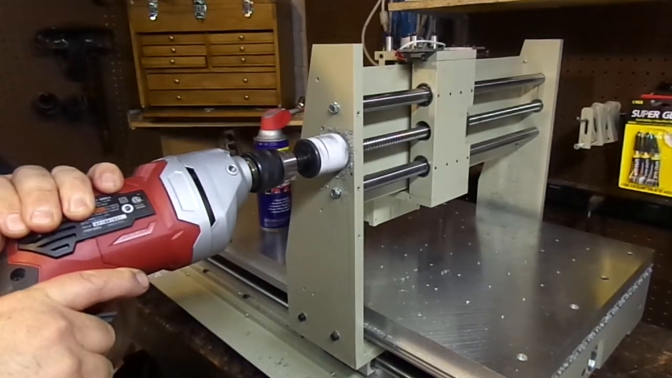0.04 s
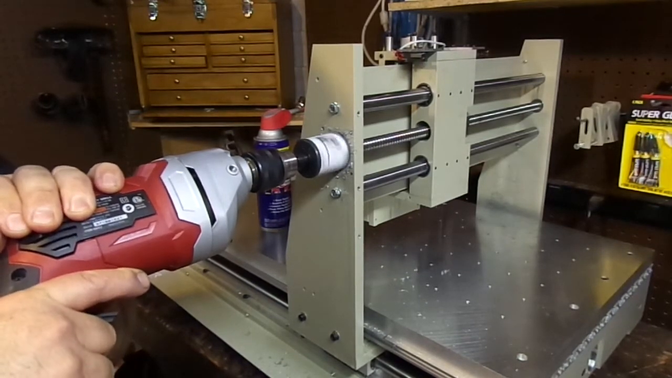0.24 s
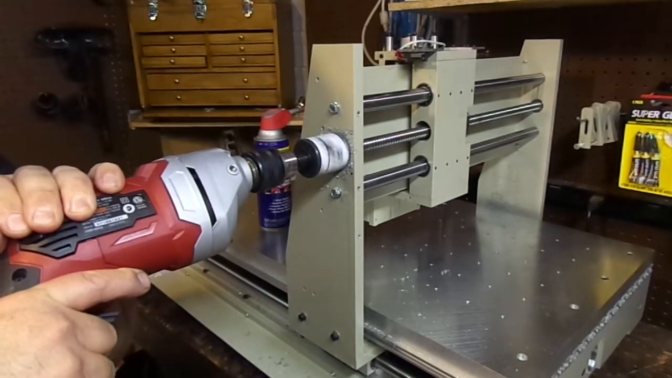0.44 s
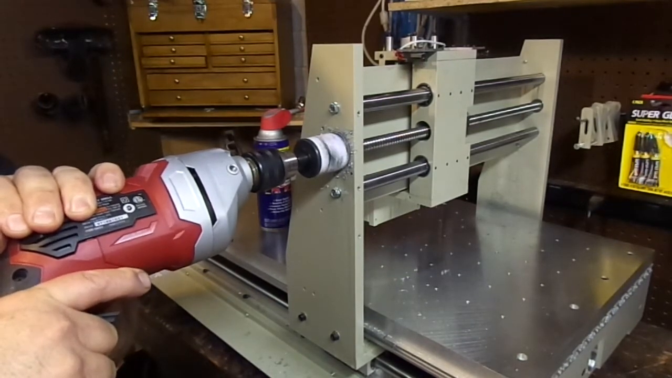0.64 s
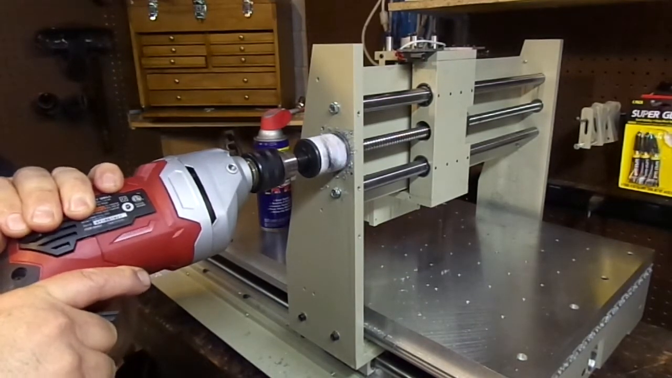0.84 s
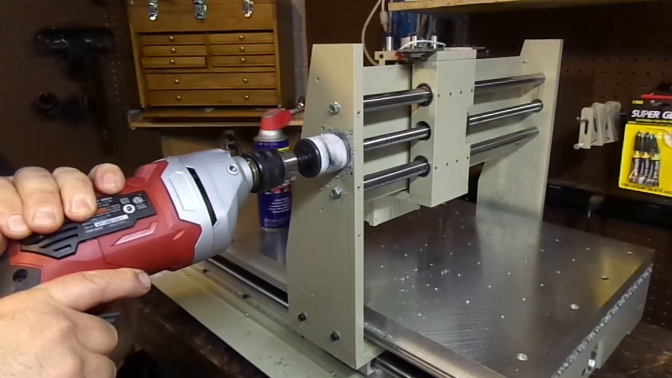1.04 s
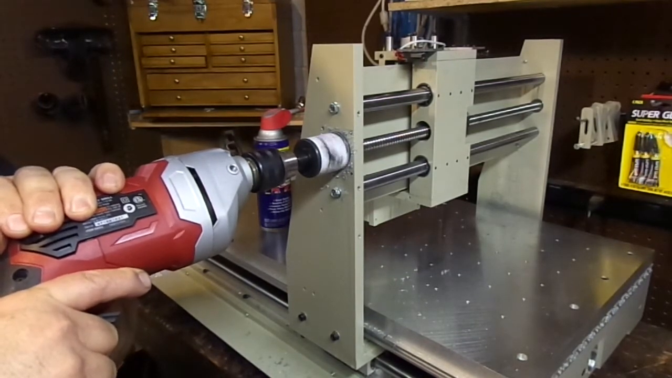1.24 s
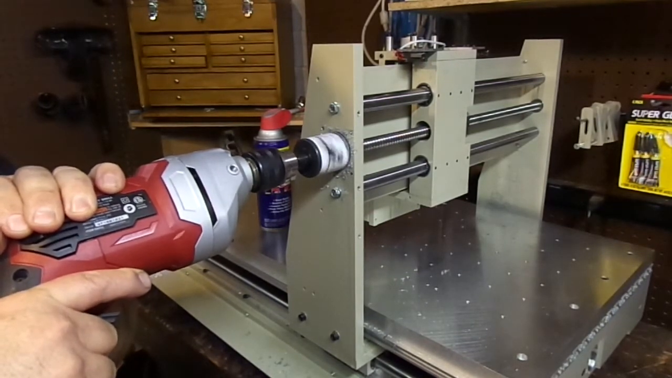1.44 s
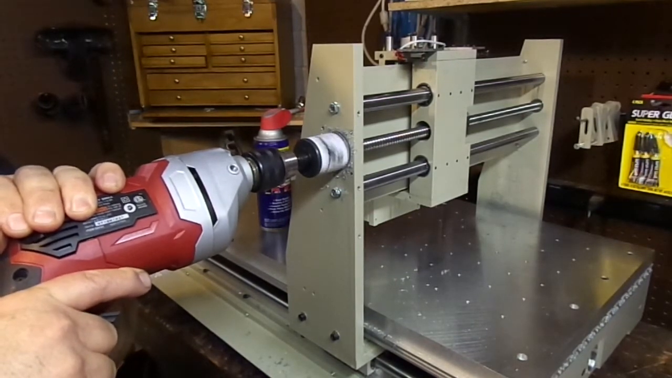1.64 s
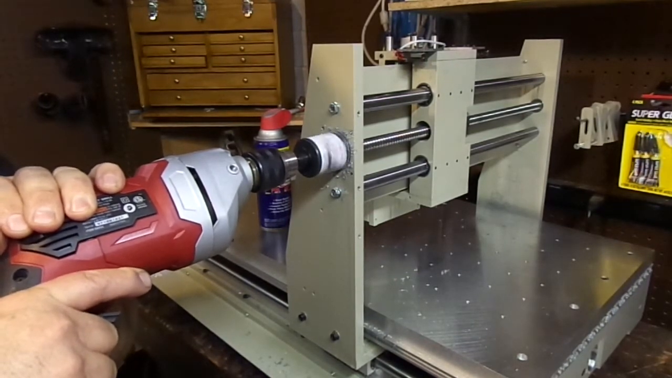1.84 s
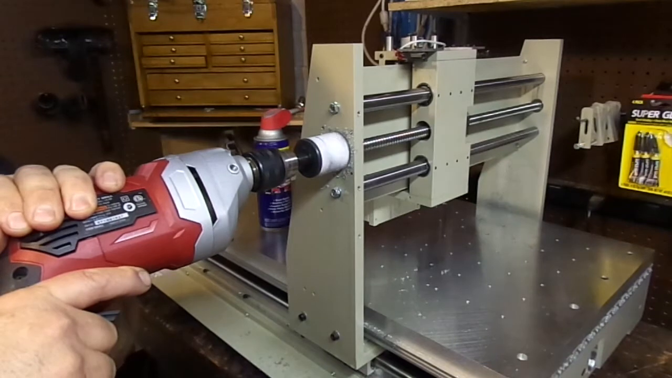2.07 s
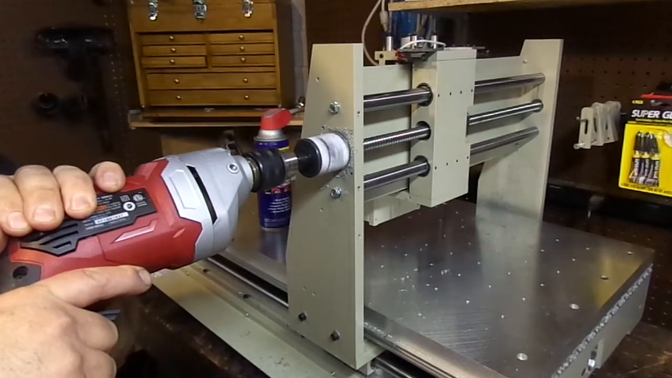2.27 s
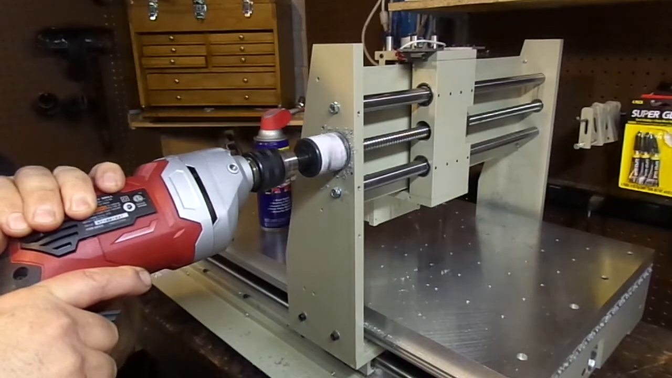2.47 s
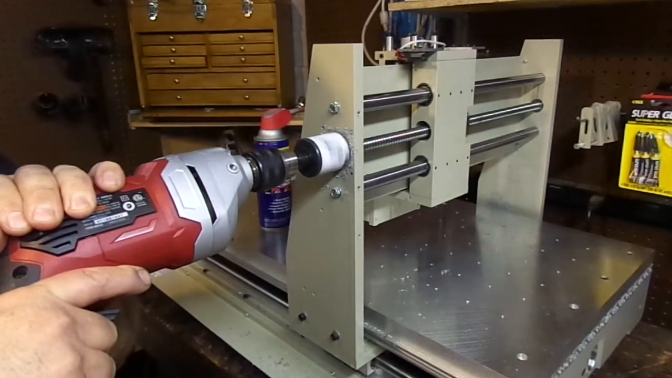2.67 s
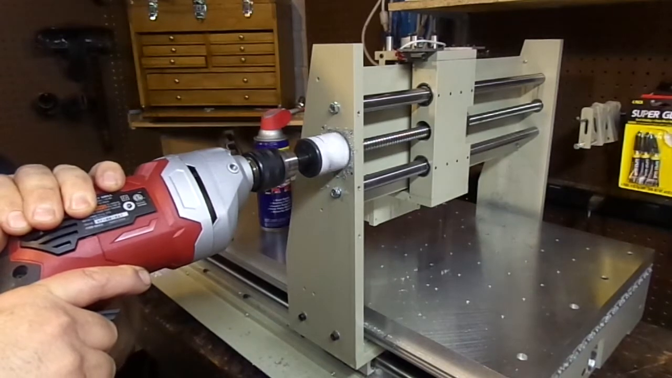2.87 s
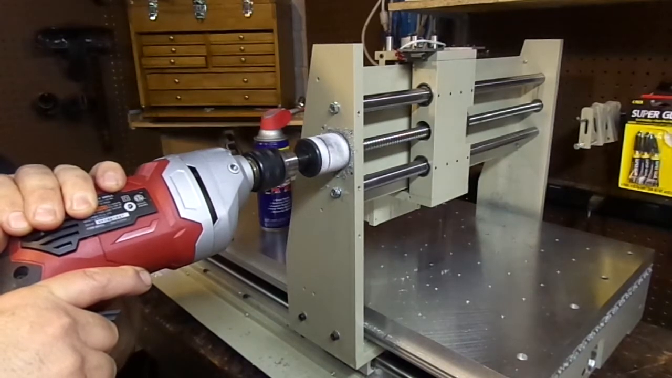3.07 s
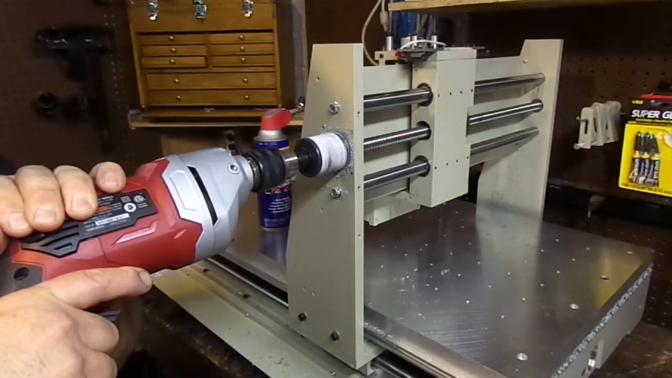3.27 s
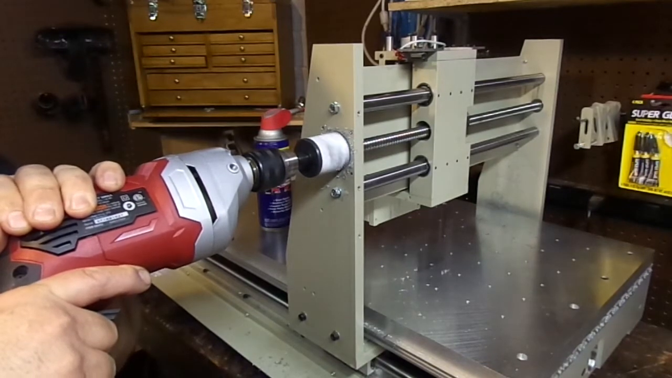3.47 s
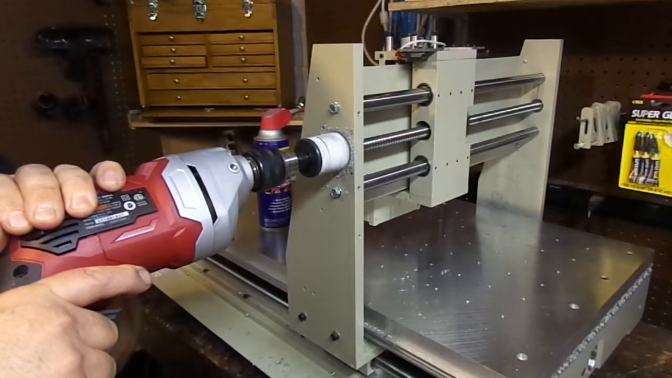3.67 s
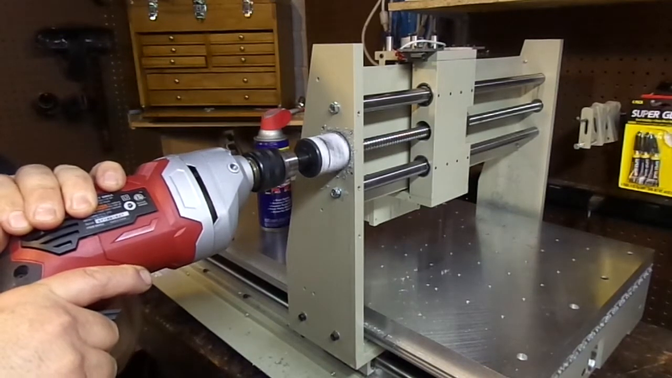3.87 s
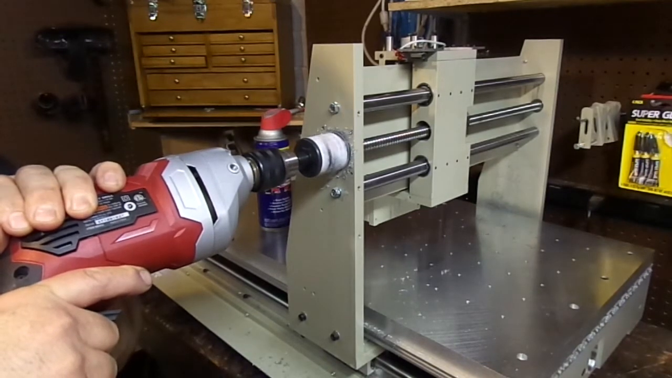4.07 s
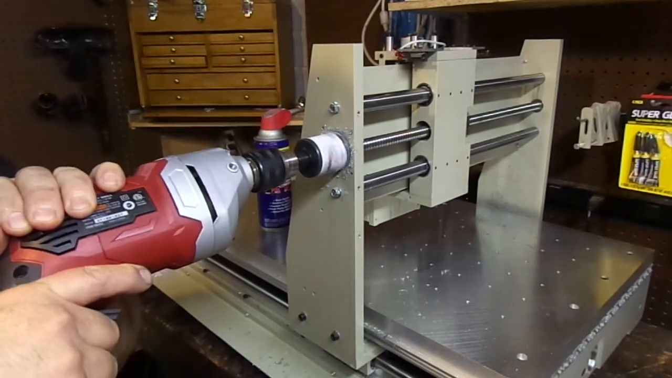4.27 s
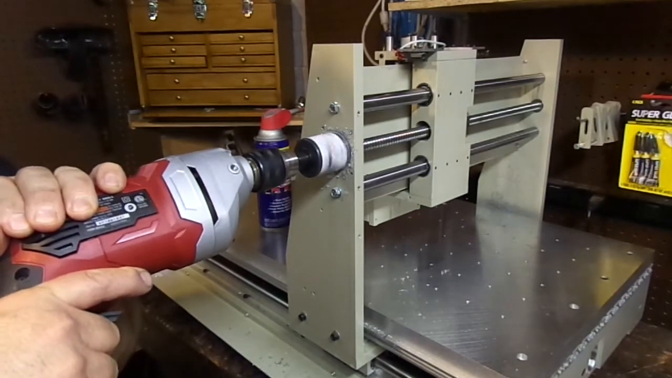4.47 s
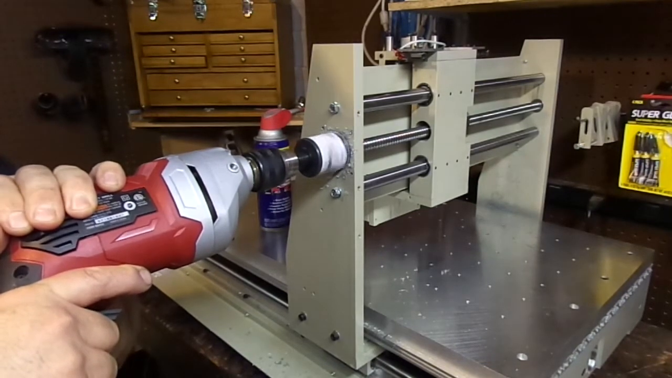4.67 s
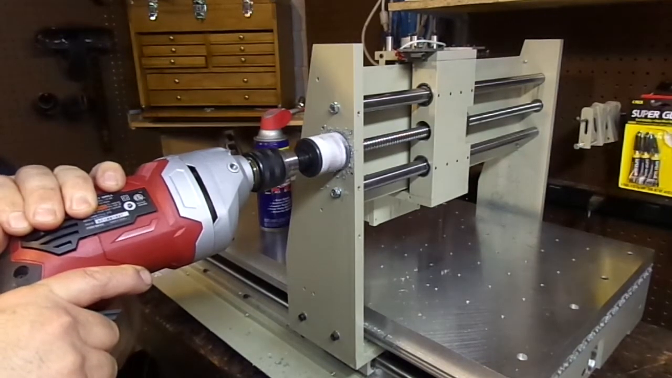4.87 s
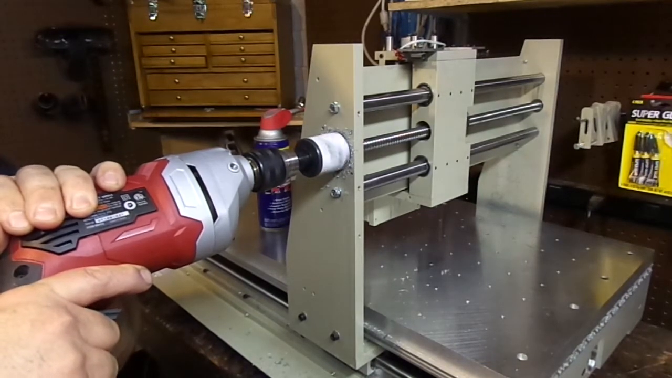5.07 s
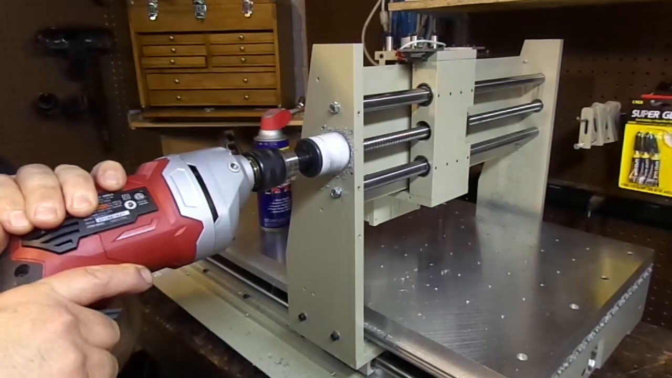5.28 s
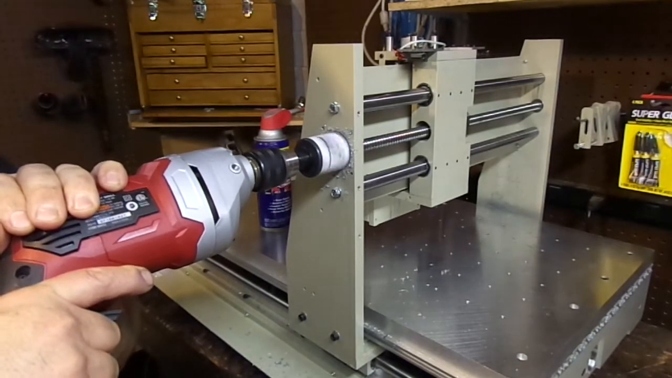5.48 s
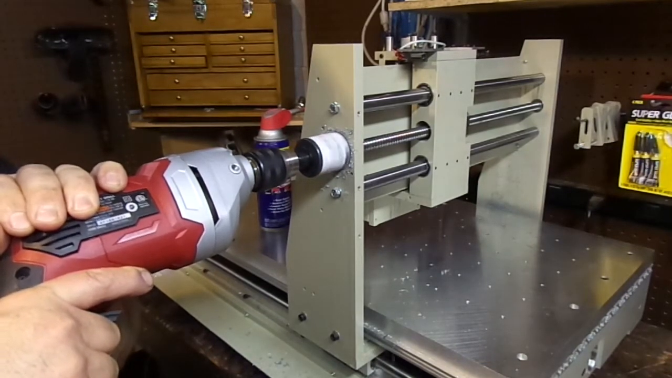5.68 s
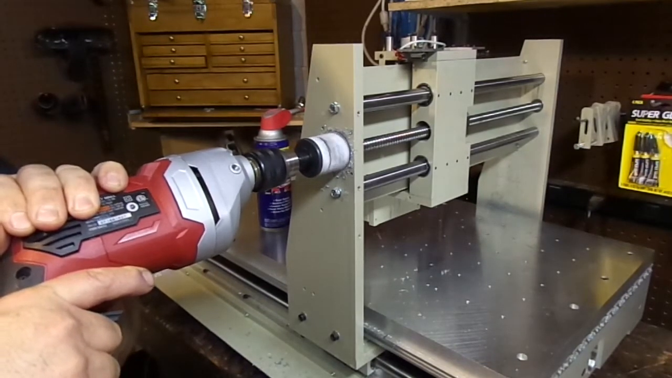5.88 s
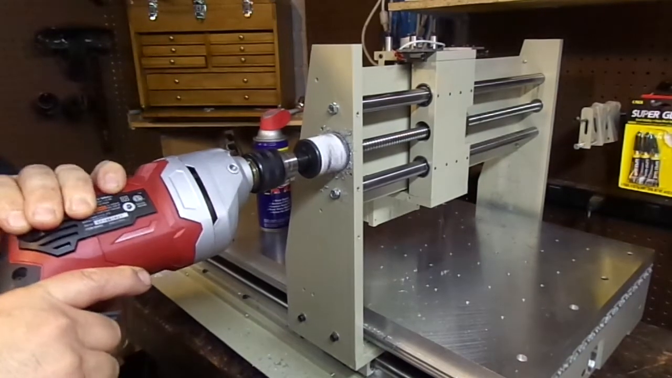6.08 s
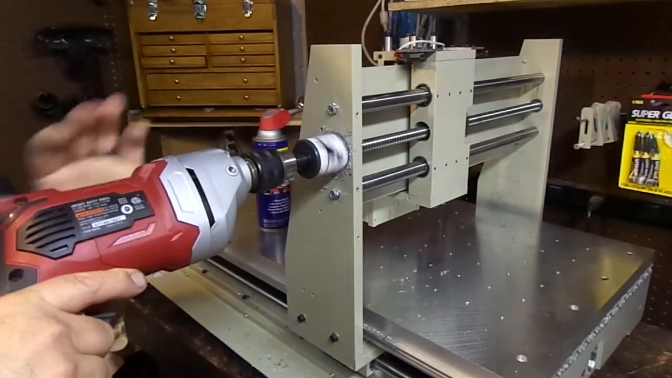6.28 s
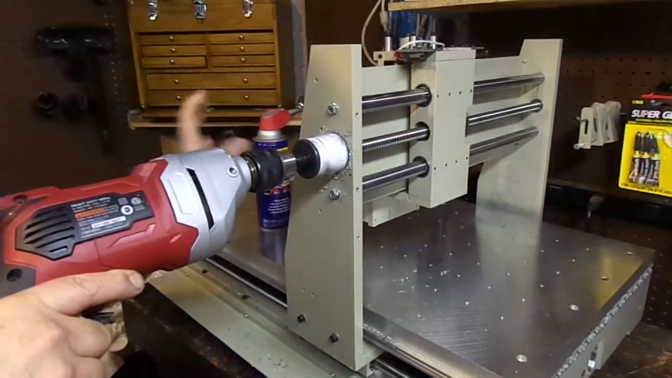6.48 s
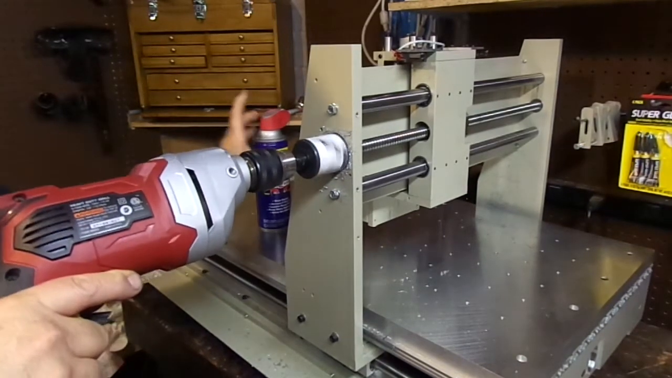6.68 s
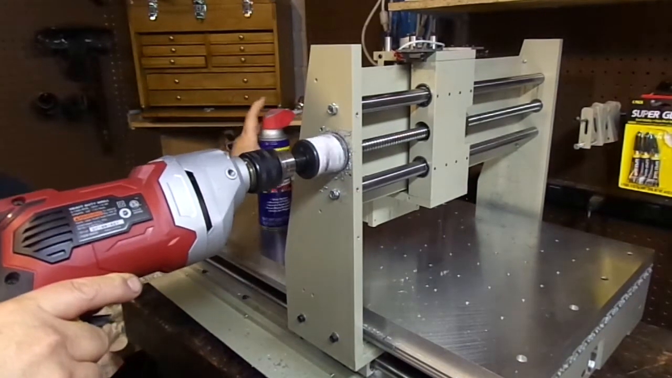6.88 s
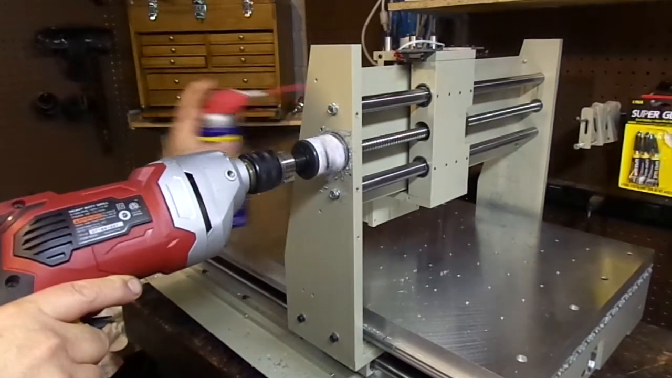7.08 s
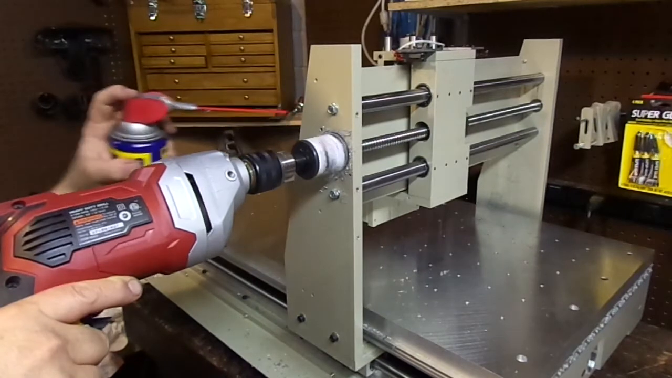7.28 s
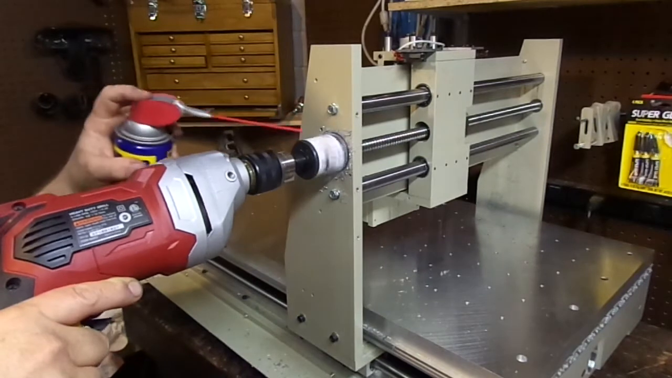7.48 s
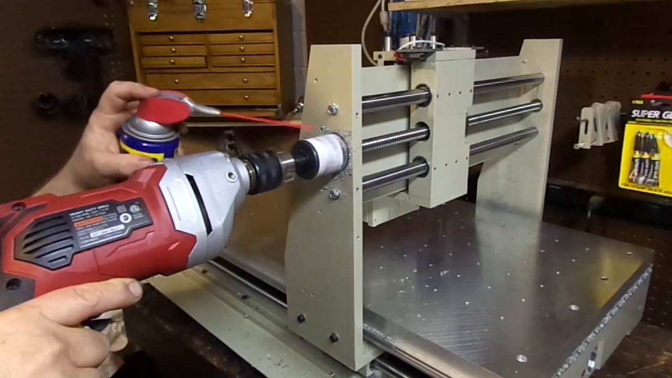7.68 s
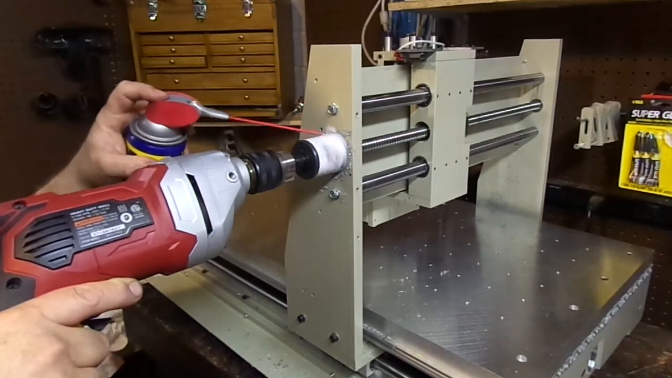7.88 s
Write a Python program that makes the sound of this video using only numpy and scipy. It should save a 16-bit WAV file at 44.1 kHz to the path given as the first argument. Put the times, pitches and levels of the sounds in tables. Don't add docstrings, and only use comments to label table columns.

```python
import sys
import numpy as np
from scipy import signal
from scipy.fft import rfft, irfft
from scipy.io import wavfile
from scipy.ndimage import uniform_filter1d

SR = 44100
rng = np.random.default_rng(int(sys.argv[2]) if len(sys.argv) > 2 else 0)


def voltage_ratio(level):
    return 10 ** (np.asarray(level, float) / 20)


def inscribe(sig):
    pcm = np.round(np.clip(np.atleast_2d(sig).T, -1, 1) * 32767)
    wavfile.write(sys.argv[1], SR, pcm.astype(np.int16))


N = 349272

# mesh_multiple, level_db
MESH_ORDERS = [(1, -21), (2, -1.5), (3, -1), (4, 2.5), (5, 0.5), (6, 1), (7, -1.5)]
# time_s, pitch_hz, level_db
WHISTLE = [
    (7.28, 9270, -40),
    (7.45, 9880, -40),
    (7.6, 10140, -35),
    (7.75, 10520, -38),
    (7.92, 10960, -43),
]
# time_s, level_db, pitch_hz, length_s
CHIRPS = [
    (.35, -25, 1680, 0.032),
    (1.05, -29, 1603, .04),
    (3.125, -14.5, 1620, 0.01),
    (5.38, -17.5, 1647, 0.049),
    (5.75, -17, 1649, 0.022),
    (5.89, -20, 1656, 0.054),
    (6.165, -17.5, 2436, 0.038),
]
# time_s, level_db, length_s, pitch_hz,
# width_hz
CATCHES = [(4.503, -26.5, 0.019, 463, 600), (4.41, -30, 0.22, 1400, 30), (6.074, -22, .025, 3200, 500),
           (6.12, -25, .03, 3350, 700), (6.289, -28.5, 0.11, 2246, 756), (6.363, -26, 0.049, 2550, 540),
           (6.432, -30.5, 0.065, 2169, 270), (6.557, -27, 0.052, 2370, 378), (6.719, -30, 0.051, 2300, 260),
           (6.83, -26.5, 0.04, 2485, 249), (6.827, -30, .02, 3550, 700), (6.885, -32, .02, 2450, 185.2),
           (7.066, -31, 0.077, 2760, 470), (7.088, -34, 0.065, 2100, 150), (7.07, -33, 0.056, 1398, 60),
           (7.27, -26, .04, 2420, 420), (7.27, -27, 0.037, 3600, 708), (7.484, -30, 0.054, 2529, 400),
           (7.652, -32, 0.052, 2670, 503), (7.88, -29, 0.043, 2750, 370.4), (7.24, -43, 1.8, 5295, 204)]
# time_s, level_db, pitch_hz, length_s
PLATE_HUMS = [
    (2.2, -31.5, 436, 0.24),
    (3.1, -32.5, 421, .1),
    (3.3, -31.5, 434.5, 0.13),
    (5.5, -31, 440, 0.14),
]
# pitch_hz, width_hz, peak_db over broad response
METAL = [(715, 72, 6), (822, 33, 4), (1400, 19, 3.5), (1400, 55, -0.5), (2150, 53, 3), (2400, 64, 5),
         (2600, 33, 0), (2857, 64, 6), (3088, 51, 8.5), (3410, 57, 6), (3645, 47, 8), (4220, 25, 2.5),
         (4627, 52, 8.5), (5490, 90, 6.5), (5697, 126, 7)]
# freq_hz, density_db per Hz
CUT_SPECTRUM = [(590, -40), (1000, -12.5), (1890, 1.5), (2410, 2), (2680, -2.5), (3530, 3), (5140, -9),
                (5660, -14), (7000, -11), (9100, -57), (15400, -120)]
# freq_hz, density_db per Hz
RUB_SPECTRUM = [(590, -43), (1000, -44), (1290, -9.5), (1890, -4), (2000, -7), (2450, -3), (3130, -12.5),
                (3620, -6.5), (4290, -19), (7000, -24.5), (9100, -21.5), (15400, -120)]
# freq_hz, density_db per Hz
DRONE_SPECTRUM = [(130, -29), (220, -21), (428, -4), (796, -3.5), (873, -5.5), (988, -3), (1400, -8),
                  (1820, -31), (3080, -120)]
# freq_hz, density_db per Hz
AIR_SPECTRUM = [(3240, -23), (5500, -2.5), (6860, -3.5), (10300, -2), (13500, -6.5), (14600, -9)]
# freq_hz, density_db per Hz
RUMBLE_SPECTRUM = [(12, -48), (20, -18), (38, -23), (75, -8.5), (124, -11.5), (155, -7), (226, -3.5),
                   (265, -2.5), (300, -5), (390, -4), (660, -120)]
# freq_hz, side_minus_mid_db
SIDE_LEVEL = [(60, -30), (110, -32), (200, -27), (380, -25), (690, -32.5), (1270, -30.5), (2340, -36),
              (4320, -30), (7950, -25), (14600, -29)]
# freq_hz, gain_db
CASING = [(500, -15), (1400, 2), (1700, 3), (2000, 4.5), (2400, 1.5), (3300, 2.5), (3700, 1.5), (4100, 3),
          (5000, -10), (6000, -12.5), (8000, -27)]
# start_s, end_s
WIDE = [(0, .07), (.12, .15), (.9, .97), (1.03, 1.07), (1.2, 1.48), (1.52, 1.55), (1.63, 1.67),
        (3.09, 3.17), (3.7, 3.85), (4.42, 4.6), (5.85, 5.95), (6.08, 6.12), (6.75, 6.78), (6.82, 6.95),
        (7.07, 7.17), (7.24, 7.29), (7.35, 7.55), (7.6, 7.66), (7.7, 7.8), (7.88, 7.92)]
# time_s, mesh_hz
CUTTING_SPEED = [(0.0, 664), (.15, 804), (.38, 852.5), (.58, 810), (.84, 816.5), (1.6, 762.7), (1.87, 914),
                 (2.07, 982), (2.28, 1019), (2.43, 922.7), (2.81, 888.7), (3.31, 994), (3.65, 940),
                 (3.85, 861), (4.02, 910), (4.25, 894), (4.63, 774), (5.09, 896)]
# time_s, mesh_hz
LAST_PUSH = [
    (5.34, 879),
    (5.58, 1103),
    (5.76, 1184),
    (5.87, 1199),
    (5.94, 1142),
    (6.14, 650),
    (6.4, 519),
    (7.3, 777),
    (7.92, 919),
]
# start_s, end_s
BINDS = [
    (.865, 1.45),
    (4.265, 4.5),
]
# time_s, speed_change_hz, length_s, extra_noise_db
SLIPS = [
    (1.06, 85, 0.091, 1),
    (1.284, 38, .12, -0.5),
    (2.523, 25, 0.098, 0),
    (2.993, 18, 0.16, 0.5),
    (4.122, -10, 0.098, 1),
    (4.533, 20, 0.0807, 1),
    (5.189, -45, 0.099, 0),
    (5.441, 45, .1, 1),
]
# time_s, level_db, gear_share (0-1), low_overtone_tilt_db, third_overtone_lead_db
FEED = [(0, 0.5, .58, -1, 4), (.3, 0, 0.55, 1, 5), (.8, 0.5, 0.64, 1, 2.5), (1.5, 0.5, 0.62, 1, 3.5),
        (2.3, 0.5, 0.62, 2.5, 3), (2.7, 0, 0.67, -1, 1.5), (3.2, 0.5, 0.67, 3, 4.5),
        (3.6, 0.5, 0.58, 0, 2.5), (4.15, 0.5, 0.69, 1.5, 4), (4.3, 0.5, 0.63, 2, 1),
        (4.7, 1.5, 0.62, -1, 4), (5.1, 0, 0.6, 1, 2), (5.6, 1, 0.65, 4, 4), (5.9, 0.5, .72, 7.5, 5),
        (6.08, 1, .66, -0.5, 9.5), (6.25, 1, .36, -6, -5), (7.1, -1, 0.4, -3.5, 5), (7.92, 1, 0.2, 0, 4)]
# time_s, level_db, length_s
JOLTS = [
    (3.15, 4.5, 0.12),
    (4.09, 8, .1),
    (4.521, 13.5, 0.13),
]

# cutting_db at USUAL_HZ, db_per_octave, free_db, db_per_octave
TEETH_LAW, DRONE_LAW, AIR_LAW = (-19.5, 9.5, -26, 5.5), (-29.5, 9.5, -33.5, 10), (-30.5, 9, -32.5, 10)
BENCH_LAW, PLATE_LAW = (-50.5, 0.5, -62, -8), (-36.5, 14.5, -36, 16)
USUAL_HZ, LET_GO_S = 910, (6.1, 6.2)
RELEASE_S = (5.98, 6.42)
BOUND_HZ, BIND_EDGE_S = 705.4, 0.0678
PLATE_HZ, PLATE_WIDTH_HZ = 880, 72
SHOP_T60_S, SHOP_DB = .22, -9.5
ROTOR_DB, TEETH_ON_ROTOR = -63, 6


def rms_one(x):
    return x / np.sqrt(np.mean(x ** 2) + 1e-20)


def in_time(rows):
    s, *columns = np.transpose(rows)
    return [np.interp(np.arange(N) / SR, s, c) for c in columns]


def at_hz(points, hz):
    points_hz, points_db = np.transpose(points)
    return np.interp(np.log(hz), np.log(points_hz), points_db)


def drift(rate_hz):
    r = np.exp(-40 * np.pi * rate_hz / SR)
    slow = signal.lfilter([1], [1, -2 * r, r * r], rng.standard_normal(N // 20 + 2002))[2000:]
    return np.interp(np.arange(N) / 20, np.arange(len(slow)), rms_one(slow))


def bump(at_s, length_s):
    return np.exp(-4 * ((np.arange(N) / SR - at_s) / max(length_s, .005)) ** 2)


def coloured(spectrum, patchy_db, rate_hz, top_hz=0):
    low, high = spectrum[0][0], min(max(spectrum[-1][0], top_hz), .45 * SR)
    edges = np.geomspace(low, high, int(3 * np.log2(high / low)) + 2)
    white, together, out = rng.standard_normal((2, N)), drift(rate_hz), 0
    for k, band in enumerate(zip(edges, edges[1:])):
        noise = signal.sosfilt(signal.butter(2, band, "band", fs=SR, output="sos"), white[k % 2])
        flicker_db = patchy_db * (0.12 * together + drift(rate_hz))
        out = out + noise * voltage_ratio(at_hz(spectrum, np.sqrt(band[0] * band[1])) + flicker_db)
    return rms_one(out)


def peak(x, hz, width_hz):
    r, w = np.exp(-np.pi * width_hz / SR), 2 * np.pi * hz / SR
    return signal.lfilter((1 - r * r) / 2 * np.array([1, 0, -1]), [1, -2 * r * np.cos(w), r * r], x)


def ringing(hz, width_hz):
    return rms_one(peak(peak(rng.standard_normal(N), hz, width_hz), hz, width_hz))


def metal(x):
    for hz, width_hz, peak_db in METAL:
        x = x + (voltage_ratio(peak_db) - 1) * peak(x, hz, width_hz)
    return x


def speed():
    t = np.arange(N) / SR
    bound = sum(np.clip(np.minimum(t - a, b - t) / BIND_EDGE_S + .5, 0, 1) for a, b in BINDS)
    hz = in_time(list(CUTTING_SPEED) + list(LAST_PUSH))[0] * (1 - bound) + BOUND_HZ * bound
    return hz + sum(step_hz * bump(at, length) for at, step_hz, length, _ in SLIPS)


def level_db(law, hz, feed_db):
    octaves = np.log2(hz / USUAL_HZ)
    free = np.interp(np.arange(N) / SR, LET_GO_S, [0, 1])
    return (1 - free) * (law[0] + law[1] * octaves) + free * (law[2] + law[3] * octaves) + feed_db


def shop(x):
    t = np.arange(SR // 2) / SR
    tail = rng.standard_normal(len(t)) * voltage_ratio(-60 * t / SHOP_T60_S) * (t > .003)
    wet = signal.fftconvolve(x, voltage_ratio(SHOP_DB) * tail / np.sqrt(np.sum(tail ** 2)))[:N]
    return (x + wet) / np.sqrt(1 + voltage_ratio(2 * SHOP_DB))


def bench_rumble(hz, jolts_db):
    rumble_db = level_db(BENCH_LAW, hz, jolts_db + 1.1 * drift(5))
    return voltage_ratio(rumble_db) * coloured(RUMBLE_SPECTRUM, patchy_db=-0.2, rate_hz=5.5)


def rotor(phase):
    running_free = np.interp(np.arange(N) / SR, (6.9, 7.4), [0, 1])
    return voltage_ratio(ROTOR_DB + 2.0 * drift(6)) * running_free * np.sin(phase / TEETH_ON_ROTOR)


def whistle():
    t = np.arange(N) / SR
    hz, whistle_db = in_time(WHISTLE)
    phase = 2 * np.pi * np.cumsum(hz) / SR + .8 * drift(40)
    fade = np.clip((t - WHISTLE[0][0]) / 0.045, 0, 1)
    late = np.clip((t - 7.62) / 0.14, 0, 1) * voltage_ratio(-4.0 + 2.9 * drift(8.6))
    tones = np.sin(phase) + late * np.sin(phase * 4 / 3)
    return np.sqrt(2) * voltage_ratio(whistle_db + 1.9 * drift(14.6)) * fade * tones


def commutator(phase, faint_db):
    t = np.arange(N) / SR
    blur = drift(90) + 1j * drift(90)
    return voltage_ratio(faint_db + 3 * drift(2.6)) * np.imag(blur * np.exp(12j * phase)) * (t < RELEASE_S[0] + .05)


def fan_air(hz, feed_db, phase):
    hiss = coloured(AIR_SPECTRUM, patchy_db=0.5, rate_hz=17, top_hz=17550)
    return voltage_ratio(level_db(AIR_LAW, hz, 0.31 * feed_db)) * (hiss + commutator(phase, faint_db=-17.5))


def casing_drone(hz, feed_db, jolts_db):
    drone_db = level_db(DRONE_LAW, hz, 0.33 * feed_db + 0.26 * jolts_db + 1.18 * drift(4.4))
    return voltage_ratio(drone_db - 1.0) * rms_one(metal(coloured(DRONE_SPECTRUM, patchy_db=1.0, rate_hz=16)))


def plate_ring(hz):
    return voltage_ratio(level_db(PLATE_LAW, hz, 1.04 * drift(4)) + 2.0) * ringing(PLATE_HZ, PLATE_WIDTH_HZ)


def squeals(rows, wander_rad):
    t, shake = np.arange(N) / SR, wander_rad * drift(28)
    return sum(voltage_ratio(db) * bump(at, length) * np.sin(2 * np.pi * hz * t + shake) for at, db, hz, length in rows)


def saw_catches():
    return sum(voltage_ratio(db) * bump(at, length) * ringing(hz, width) for at, db, length, hz, width in CATCHES)


def saw(cut_db, share):
    pressed = np.interp(np.arange(N) / SR, RELEASE_S, [1, 0])
    cutting = pressed * coloured(CUT_SPECTRUM, patchy_db=0.7, rate_hz=25)
    rubbing = np.sqrt(1 - pressed ** 2) * coloured(RUB_SPECTRUM, patchy_db=1.1, rate_hz=25)
    grind = rms_one(metal(cutting + rubbing))
    return grind * voltage_ratio(cut_db - 1.0) * np.sqrt(1 - share ** 2) + saw_catches()


def gears(phase, hz, turn, tilt_db, third_db, throb_db, steady, rate_hz):
    tones, lean_db = 0, {2: tilt_db, 3: third_db, 4: -tilt_db}
    for k, db in MESH_ORDERS:
        shake = steady + drift(rate_hz * (2 + k)) + 1j * drift(rate_hz * (2 + k))
        throb = throb_db * np.sin(turn + 1.08 * drift(3.9))
        order_db = db + lean_db.get(k, 0) + at_hz(CASING, k * hz) + throb
        tones = tones + voltage_ratio(order_db) * np.imag(shake * np.exp(1j * k * phase))
    tones = metal(tones)
    return tones / np.sqrt(uniform_filter1d(tones ** 2, size=SR // 3) + 1e-12)


def faint_side(mid):
    t = np.arange(N) / SR
    wide = uniform_filter1d(sum(1. * (t >= a) * (t <= b) for a, b in WIDE), size=600)
    bins_hz = np.arange(N // 2 + 1) * SR / N + 1
    return wide * irfft(rfft(np.roll(mid, 1500)) * voltage_ratio(at_hz(SIDE_LEVEL, bins_hz) + 11.5), N)


def scene():
    hz = speed()
    feed_db, share, tilt_db, third_db = in_time(FEED)
    share = np.clip(share, 0, .97)
    slips_db = sum(db * bump(at, length) for at, _, length, db in SLIPS)
    jolts_db = sum(db * bump(at, length) for at, db, length in JOLTS)
    cut_db = level_db(TEETH_LAW, hz, feed_db + slips_db)
    phase = 2 * np.pi * np.cumsum(hz * (1 + 0.002992 * drift(12.3))) / SR
    turn = phase / 35 + 0.57 * drift(4.2)
    wobble = voltage_ratio(0.35 * np.sin(turn))
    slack = bump(5.0, 0.27)
    song = gears(phase, hz, turn, tilt_db, third_db, throb_db=2.8 + 6 * slack, steady=1.05, rate_hz=14)
    song = voltage_ratio(cut_db) * share * song
    mid = wobble * (song + saw(cut_db, share) + fan_air(hz, feed_db, phase))
    mid = mid + casing_drone(hz, feed_db, jolts_db) + bench_rumble(hz, jolts_db)
    mid = mid + whistle() + rotor(phase) + plate_ring(hz)
    mid = shop(mid + squeals(CHIRPS, wander_rad=1.6) + squeals(PLATE_HUMS, wander_rad=0.26))
    side = faint_side(mid)
    return np.array([mid + side, mid - side])


def treble_gaps(x, rare):
    hz, _, frames = signal.stft(x, SR, nperseg=1024)
    chance = uniform_filter1d(rng.standard_normal(frames.shape[1:]), size=9, axis=1)
    chance = uniform_filter1d(chance, size=4, axis=0)
    limit = rare + .75 * np.log2(15000 / np.maximum(hz, 100))[:, None]
    return signal.istft(frames * (chance / chance.std() < limit), SR, nperseg=1024)[1][:, :N]


def band_limit(x):
    return signal.sosfilt(signal.butter(12, 15250, fs=SR, output="sos"), x)


def record(dry):
    bins_hz = np.arange(N // 2 + 1) * SR / N
    rounded = .9 * np.tanh(dry / .9)
    cut = irfft(rfft(rounded) * (bins_hz < 15050), N)
    mix = treble_gaps(cut, rare=1.3)
    return band_limit(mix)


dry = scene()
out = record(dry)
inscribe(out)
```